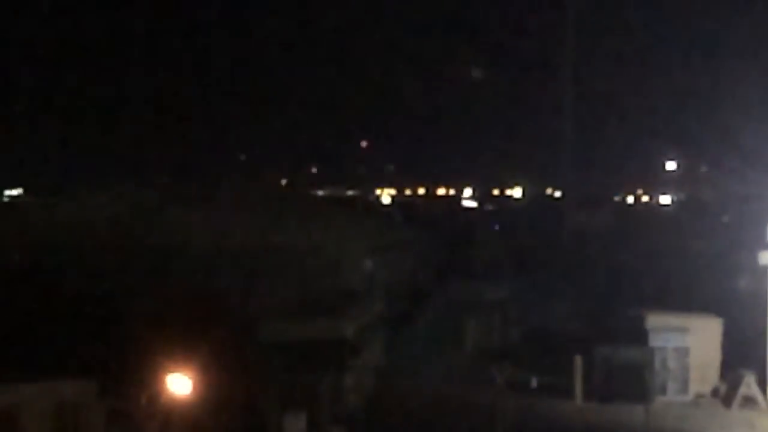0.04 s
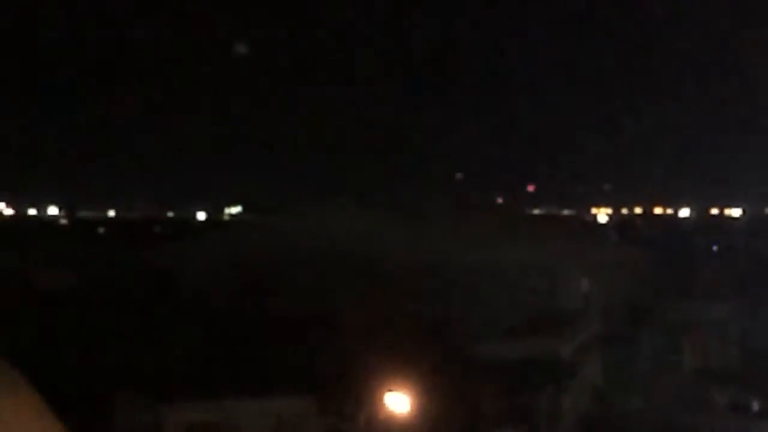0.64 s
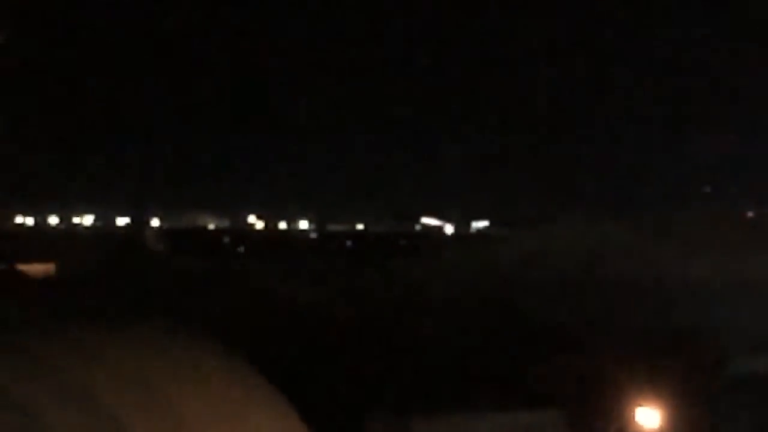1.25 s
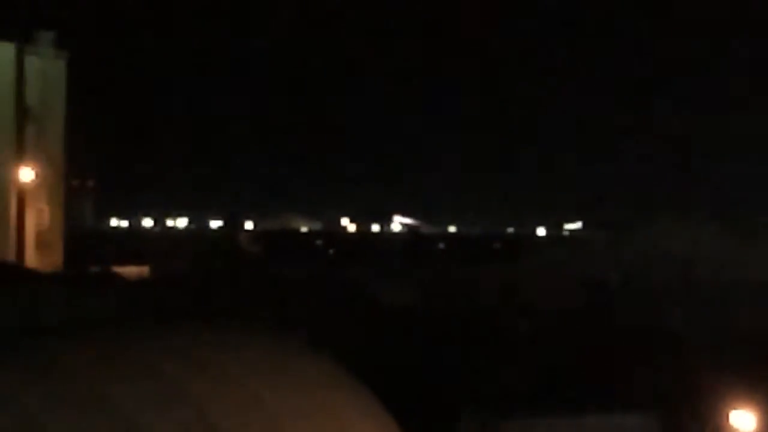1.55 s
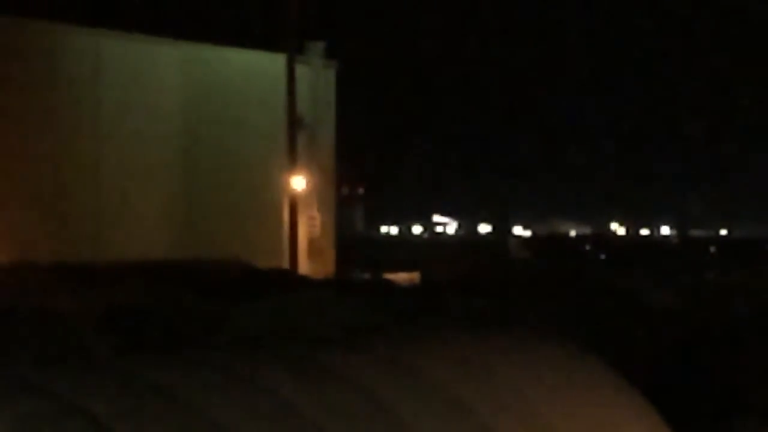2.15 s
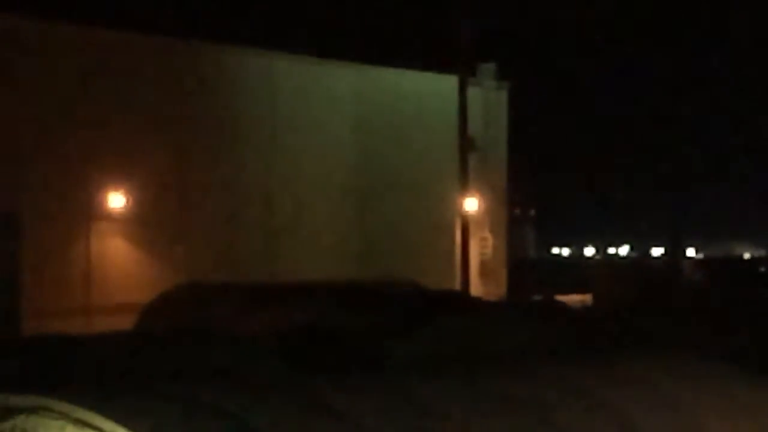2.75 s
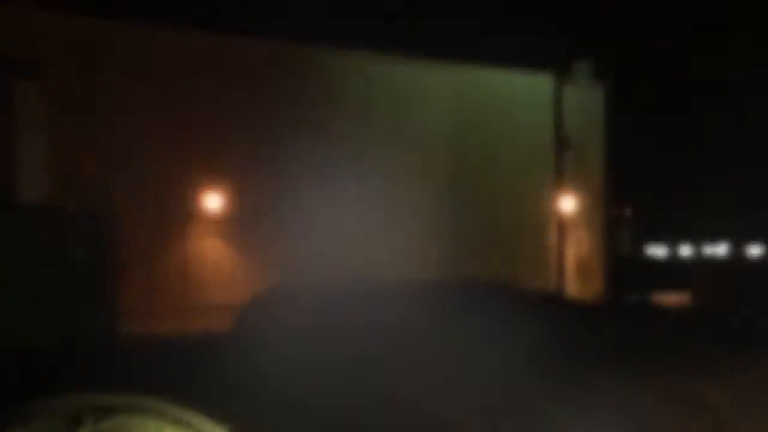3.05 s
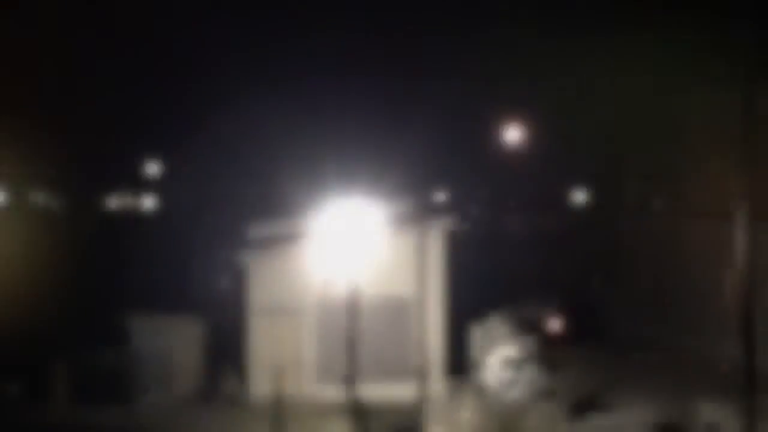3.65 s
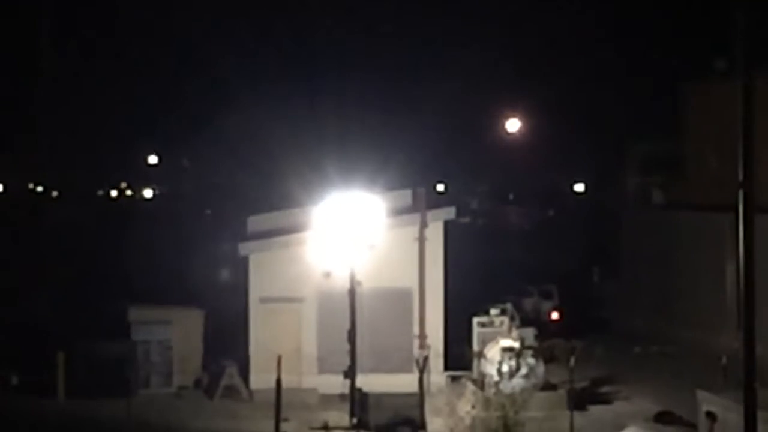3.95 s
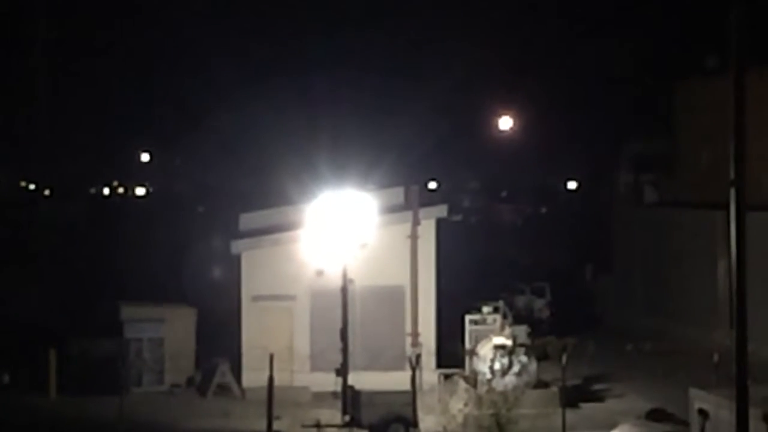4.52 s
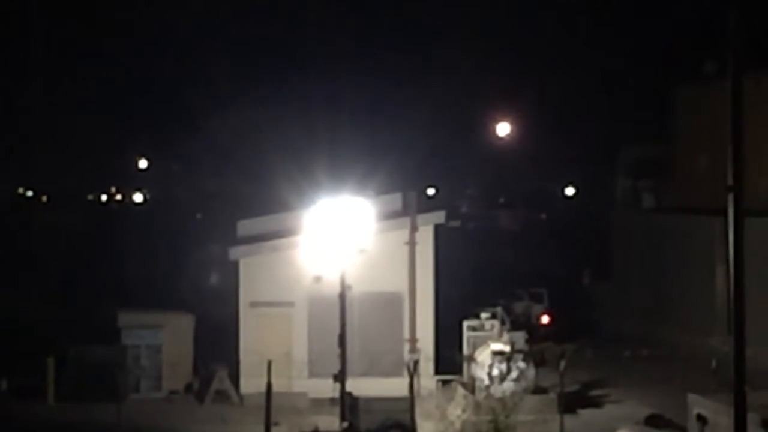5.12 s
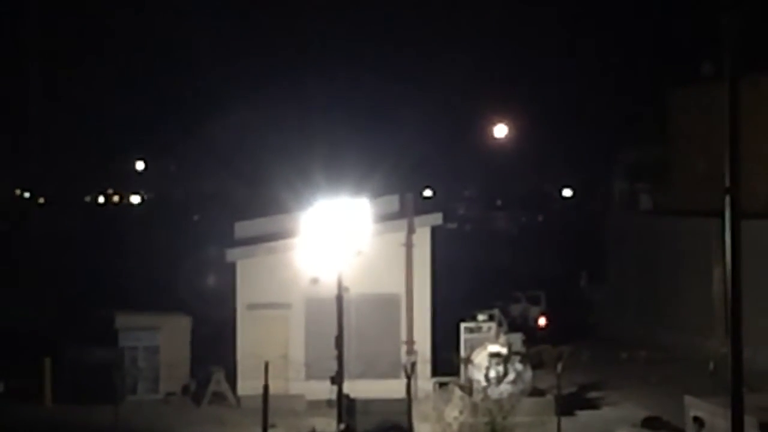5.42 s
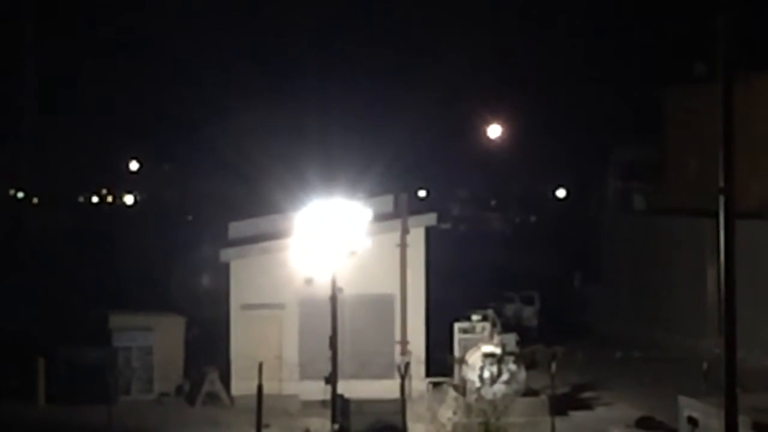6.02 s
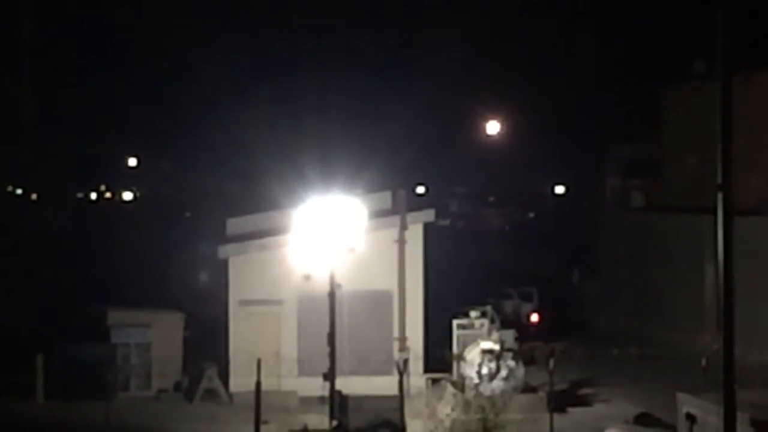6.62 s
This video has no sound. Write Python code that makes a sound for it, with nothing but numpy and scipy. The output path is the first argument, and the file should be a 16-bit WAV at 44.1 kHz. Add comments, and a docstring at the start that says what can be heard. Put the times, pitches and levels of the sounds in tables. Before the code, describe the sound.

On an open airfield, rough gusts hit the microphone with booming, sharp crackles and a hollow ring, covering a low rumble. About halfway through, the wind dies down and a faraway jet taking off is left: a deep, pulsing rumble under a dull roar that gradually gets fuller and brighter. A faint whine fades into it, with a few very soft finger scuffs near the microphone.

```python
"""A jet takes off far across an airfield at night. At first a blast of wind scours the one microphone
of a turning camera: eddies roar, crackle and ring in its port and boom against the body.
After three and a half seconds the microphone is in the lee. The jet's deep rumble and distant roar
take over and slowly grow, a faint turbine whine sinks into them, and fingers brush the casing."""
import sys
import numpy as np
from scipy import signal
from scipy.fft import rfft, irfft, next_fast_len
from scipy.io import wavfile
from scipy.ndimage import uniform_filter1d, map_coordinates

SR = 44100
rng = np.random.default_rng(int(sys.argv[2]) if len(sys.argv) > 2 else 0)


def wav_record(signal):
    """Record a signal, one row per channel, as 16-bit PCM in the file named by sys.argv[1]."""
    frames = np.transpose(np.atleast_2d(signal))
    bounded = np.clip(frames, -1, 1)
    # unit amplitude maps onto the largest positive 16-bit level
    quanta = np.round(bounded * 32767).astype(np.int16)
    wavfile.write(sys.argv[1], SR, quanta)


N = 298557

# short gusts that rasp and crackle in the port: t/s, half-length/s, rasp level/dB, crackle level/dB
PORT_GUSTS = [(0.256, 0.14, -31, -67), (0.535, 0.023, -30, -70), (0.684, 0.048, -34, -54),
              (0.803, 0.027, -30, -66.5), (0.879, 0.027, -26.5, -50), (1.112, 0.02, -30, -60),
              (1.23, 0.036, -31, -66), (1.417, 0.035, -34, -77), (2.05, 0.064, -33, -61),
              (2.26, 0.0098, -46, -53), (2.33, 0.016, -32, -55), (2.394, 0.027, -36, -55),
              (2.737, 0.012, -37, -47.5), (2.79, 0.012, -49, -56), (2.92, 0.011, -34, -60),
              (2.963, 0.021, -34, -54), (3.02, 0.039, -35.5, -52), (3.12, 0.022, -35, -52),
              (3.178, 0.018, -50, -56), (3.255, 0.012, -36, -53), (3.3, 0.016, -53, -52),
              (3.364, 0.036, -47, -54), (3.447, 0.012, -40, -52), (3.517, 0.029, -42, -51.5),
              (3.563, 0.012, -39, -53), (3.604, 0.013, -49, -51), (3.662, 0.033, -59, -57),
              (3.806, 0.028, -54, -54)]


def amp(db):
    """Decibels to gain."""
    return 10 ** (np.asarray(db) / 20)


def unit(x):
    """x at rms 1."""
    return x / np.sqrt(np.mean(x ** 2) + 1e-20)


def clock():
    """The time of each sample in seconds."""
    return np.arange(N) / SR


def curve(points):
    """An envelope of straight lines through (t/s, value) points."""
    return np.interp(clock(), *np.transpose(points))


def swells(rows):
    """The summed gain of bell-shaped swells: t/s, half-length/s, level/dB."""
    return sum(amp(db) * np.exp(-.5 * ((clock() - s) / length) ** 2) for s, length, db in rows)


def wobble(rate):
    """A smooth random curve, rate knots a second."""
    knots = rng.standard_normal(int(N * rate / SR) + 4)
    return map_coordinates(knots, [clock() * rate], mode="nearest")


def filtered(x, response):
    """x through a gain that depends on frequency."""
    size = next_fast_len(N + 8192)
    return irfft(rfft(x, size) * response(np.fft.rfftfreq(size, 1 / SR)), size)[:N]


def coloured(x, eq):
    """x through an EQ curve of (f/Hz, level/dB) points on a log axis."""
    f, db = np.transpose(eq)
    return filtered(x, lambda hz: amp(np.interp(np.log(hz + 1), np.log(f), db, left=-120, right=-120)))


def steadied(x, seconds):
    """x at rms 1, its slow swells evened out and its fast flutter kept."""
    power = np.abs(uniform_filter1d(x ** 2, size=int(seconds * SR) + 1))
    return unit(x / np.sqrt(power + 1e-9))


def turbulence(eq, patchy_db):
    """Coloured noise of rms 1 whose bands fade in and out in random patches."""
    bands = signal.stft(rng.standard_normal(N), nperseg=1024)[2]
    patches = uniform_filter1d(rng.standard_normal(bands.shape), size=3, axis=0)
    patches = unit(uniform_filter1d(patches, size=12, axis=1))
    noise = signal.istft(bands * amp(patchy_db * patches), nperseg=1024)[1][:N]
    return unit(coloured(noise, eq))


def narrow_noise(hz, width_hz):
    """Noise of rms 1 in one resonance, which may glide."""
    phase = 2 * np.pi * np.cumsum(hz * np.ones(N)) / SR
    band = lambda: filtered(rng.standard_normal(N), lambda f: 1 / (1 + (2 * f / width_hz) ** 2) ** 1.16)
    return unit(band() * np.cos(phase) + band() * np.sin(phase))


def pop_train(rate, spread_db):
    """Pressure jumps of random size at random moments, about rate a second."""
    chance, size = rng.random(N), rng.standard_normal(N)
    return unit((chance < rate / SR) * amp(spread_db * np.minimum(size, 2.5)))


def exposure(cut_s, fade_s):
    """Fades from 1 to 0 as the microphone turns out of the wind."""
    return .5 - .5 * np.tanh((clock() - cut_s) / fade_s)


def head_on():
    """Fades from 1 to 0 as the port turns from facing the wind to lying aslant."""
    return exposure(cut_s=2.7, fade_s=.35)


def wind_db():
    """How far the wind is above its usual strength."""
    # wind on the microphone: t/s, level/dB
    strength = [(0.0, -28.5), (0.25, -25), (0.43, -24), (0.47, -18), (0.58, -25), (0.6, -20.5), (0.92, -23),
                (0.96, -27), (1.1, -25), (1.4, -21.5), (1.58, -30), (1.86, -27.5), (2.01, -22.5),
                (2.3, -19.5), (2.5, -24), (2.78, -23.5), (2.84, -27.5), (3.08, -23), (3.42, -28),
                (3.76, -38.5), (3.9, -44)]
    usual_db = -24
    return curve(strength) - usual_db


def jet_growth(start_s=3.9):
    """Seconds squared since start_s: the shape of the jet's ever faster crescendo in dB."""
    return np.maximum(clock() - start_s, 0) ** 2


def scuffs():
    """Fingers shift softly on the casing."""
    # light touches: t/s, half-length/s, level/dB
    touches = [(4.378, .004, -74), (4.783, .005, -75.5), (5.836, .007, -71), (5.883, .010, -68.5),
               (5.94, 0.021, -77), (6.48, .008, -76)]
    friction_eq = [(2000, -9), (4500, 3.5), (6000, -1), (7500, -13.5), (8200, -35)]
    return swells(touches) * turbulence(friction_eq, patchy_db=4)


def jet_rumble():
    """The jet's low end throbs in two humps and surges now and then; it is leaner while the gusts last."""
    # slow course of the rumble, and its brief surges: t/s, level/dB
    course = [(0, -37.5), (1.1, -37), (1.5, -29), (2.2, -32.5), (3.4, -31), (3.8, -26), (4.3, -22.5),
              (4.42, -28.5), (4.55, -25), (5.2, -24.5), (5.31, -30), (5.45, -24.5), (6.25, -25.5),
              (6.77, -27.5)]
    surges = [(2.6, -26), (3.81, -22), (4.2, -28), (4.58, -25), (4.76, -25), (5.11, -24.5), (5.76, -23),
              (5.92, -28), (6.5, -22.5), (6.6, -23)]
    # the bass bed: f/Hz, level/dB
    bed_eq = [(15, -23.5), (25, -15.5), (36, -3.5), (45, -11), (58, 1.5), (72, -12), (82, -4), (94, -1),
              (112, -11.5), (140, -24.5), (220, -46)]
    # narrow humps on that bed: f/Hz, width/Hz, relative level/dB
    hump_bands = [(58, 24, -2.5), (94, 32, -5.5)]
    surge_gain = swells([(s, 0.038, db) for s, db in surges])
    gain = np.hypot(amp(curve(course) + 0.54 * wobble(9.3)), surge_gain)
    humps = sum(amp(db) * narrow_noise(hz, width_hz) for hz, width_hz, db in hump_bands)
    deep = turbulence(bed_eq, patchy_db=0) + humps
    lean = coloured(deep, [(15, -22.5), (30, -9.5), (45, -11.5), (75, -3.5), (250, 3.5)])
    gusty = exposure(cut_s=3.8, fade_s=.2)
    return gain * steadied(gusty * lean + (1 - gusty) * deep, seconds=0.17)


def jet_exhaust():
    """Exhaust noise dulled by distance: over a faint steady hiss, the brighter layers grow faster."""
    # exhaust layers from low to high: f/Hz, level/dB
    drone_eq = [(90, -20), (130, 1.5), (175, -5), (222, 1.2), (270, -0.9), (310, -3.5), (365, -4),
                (425, -13), (560, -28.5)]
    middle_eq = [(380, -13.5), (480, 0), (560, 0.5), (680, -1.5), (820, -2.5), (960, -4.5), (1080, -16.5),
                 (1600, -44.5)]
    wash_eq = [(600, -16), (1050, 1), (1300, -0.5), (1700, -4), (2100, -9.5), (2600, -20), (3500, -35),
               (5000, -46), (7300, -54.5), (8000, -56)]
    edge_eq = [(1500, -13.5), (2300, 4.5), (3000, -5), (4200, -23)]
    hiss_eq = [(2500, -3.5), (3500, 0.0), (5000, -7), (7400, -12.0), (8100, -30.5)]
    # swells of the drone: t/s, half-length/s, level/dB
    drone_swells = [(4.0, 0.022, -33), (4.4, 0.051, -33.5), (4.55, 0.022, -29), (5.0, 0.042, -33),
                    (5.82, 0.065, -32), (6.29, 0.044, -27)]
    growth = jet_growth()
    drone_gain = np.hypot(amp(-32 + 0.33 * growth + 0.14 * wobble(19)), swells(drone_swells))
    drone = drone_gain * steadied(turbulence(drone_eq, patchy_db=2.5), seconds=0.23)
    middle = amp(-39 + 0.65 * growth + 0.5 * wobble(21)) * turbulence(middle_eq, patchy_db=1.0)
    wash = amp(-50 + 1.02 * growth + 0.71 * wobble(22)) * turbulence(wash_eq, patchy_db=1.0)
    hiss = amp(-76.5) * turbulence(hiss_eq, patchy_db=2.0)
    edge = amp(-79 + 2.5 * growth) * turbulence(edge_eq, patchy_db=0.5)
    return drone + middle + wash + edge + hiss


def jet_turbine():
    """A blurred hum and a whine that wavers with the shaft speed; both sink as the roar grows."""
    # whine partials: f/Hz, amplitude before the fade/dB
    partials = [(460, -58.5), (928, -46.3), (1586, -70.5)]
    fade_db = -1.5 * jet_growth()
    hum = amp(-40.3 + fade_db) * steadied(narrow_noise(221, width_hz=8.7), seconds=0.4)
    shaft_speed = 1 + 0.0037 * wobble(5.5) + 0.007 * wobble(60)
    phase_per_hz = 2 * np.pi * np.cumsum(shaft_speed) / SR
    whine = sum(amp(db + fade_db + 2.1 * wobble(11)) * np.sin(hz * phase_per_hz) for hz, db in partials)
    return hum + whine


def buffeting():
    """Large slow eddies boom, howl and throb against the camera body."""
    # envelopes of boom and howl: t/s, relative level/dB
    boom_course = [(0.04, -29), (0.14, -23.5), (1.11, -23), (1.17, -17), (1.23, -24.5), (1.49, -17),
                   (1.6, -21.5), (2.2, -21), (2.6, -21), (3.29, -22.5), (3.7, -36.5)]
    howl_course = [(0.0, -28.5), (0.17, -25.5), (0.84, -21.5), (1.02, -29), (1.22, -22.5), (1.59, -28),
                   (2.5, -22), (2.95, -17.5), (3.35, -25), (3.6, -25.5), (3.8, -22.5)]
    # their tone colours: f/Hz, level/dB
    boom_eq = [(60, -46.5), (85, -25.5), (108, -1.5), (150, -0.5), (190, 2), (225, -2), (270, -14),
               (400, -32)]
    howl_eq = [(190, -25.5), (270, 1), (330, 3.5), (410, 1.5), (540, 3.5), (680, -1.5), (820, -12),
               (980, -11), (1300, -30.5)]
    # big eddies that throb at one pitch: t/s, half-length/s, f/Hz, level/dB
    eddies = [(0.005, 0.025, 200, -23), (0.276, 0.019, 210, -24.5), (1.165, 0.023, 195, -20),
              (1.442, 0.0097, 170, -16.5), (1.477, 0.021, 185, -27.5), (1.532, 0.021, 135, -17),
              (1.703, 0.016, 170, -19), (1.822, 0.0082, 172, -15), (1.908, 0.028, 175, -20.5),
              (1.975, 0.032, 191, -20.5), (2.552, 0.096, 81.8, -25), (2.79, 0.027, 195, -21),
              (3.234, 0.25, 225, -23.5)]
    boom_gain = amp(curve(boom_course) + .6 * wobble(9.9))
    boom = boom_gain * steadied(turbulence(boom_eq, patchy_db=2.5), seconds=0.17)
    howl_gain = amp(curve(howl_course) - 1.75 + 0.63 * wobble(15.0))
    howl = howl_gain * steadied(turbulence(howl_eq, patchy_db=1.5), seconds=0.078)
    throbs = sum(swells([(s, length, db)]) * steadied(narrow_noise(hz, width_hz=36), seconds=0.073)
                 for s, length, hz, db in eddies)
    return boom + howl + throbs


def skim():
    """One gust skims the edge of the port: a thin, airy hiss swells into a lower, fuller one."""
    thin_eq = [(4000, -10), (6000, 4), (9000, -8), (12000, -20), (15200, -24)]
    full_eq = [(2500, -8), (4000, 4.5), (5200, 0.5), (6500, -11), (9500, -31), (12000, -45)]
    thin = swells([(0.474, .02, -52)]) * turbulence(thin_eq, patchy_db=4)
    full = swells([(0.503, .021, -33.5)]) * turbulence(full_eq, patchy_db=3)
    return thin + full


def port_notes():
    """Air blows hollow notes in the microphone port, each sinking as the camera turns."""
    # notes at changing angles of the air: t/s, half-length/s, f/Hz, level/dB
    notes = [(0.17, 0.054, 310, -26.5), (0.33, 0.052, 310, -28), (0.36, 0.017, 726, -20.5),
             (0.4, 0.012, 910, -21), (0.5, 0.086, 691, -27), (0.74, 0.064, 575, -20.5),
             (0.55, 0.03, 310, -23.5), (0.72, .07, 300, -29.5), (0.93, 0.061, 300, -24.5),
             (1.1, 0.038, 340, -26.5), (1.28, 0.084, 320, -25), (1.7, .1, 900, -35.5),
             (2.13, 0.064, 750, -28), (2.72, 0.02, 442.7, -19), (2.795, 0.008, 500, -17.5),
             (3.0, 0.029, 360, -19), (3.14, 0.038, 380, -25.5), (3.22, .06, 640, -27),
             (3.476, 0.11, 528, -27)]
    sag_hz_per_s = 350
    hollow = np.zeros(N)
    for s, length, hz, db in notes:
        pitch_hz = hz - sag_hz_per_s * np.clip(clock() - s, -.5, .5)
        hollow += swells([(s, length, db)]) * steadied(narrow_noise(pitch_hz, width_hz=220), seconds=0.12)
    return hollow


def port_ring():
    """The wind excites a narrow ring in the port, strongest head on."""
    # gusts that set it going: t/s, half-length/s, relative level/dB
    gusts = [(0.26, 0.07, -24), (0.475, 0.02, -25.5), (0.63, 0.04, -22), (0.695, 0.0093, -22),
             (0.905, 0.0066, -18.5), (2.165, 0.0074, -18), (2.26, 0.04, -27)]
    whistle = narrow_noise(1735 + 55 * wobble(8), width_hz=260)
    gain = np.hypot(amp(-31 + 0.74 * wind_db() + 3.3 * wobble(16)), swells(gusts))
    return gain * (0.43 + 0.46 * head_on()) * steadied(whistle, seconds=0.057)


def wind_ticks():
    """Each sharp tick is one pressure jump with its treble rolled off, and a brief sputter after it."""
    # ticks in the rush: t/s, peak level before the EQ/dB, treble roll-off/(dB per kHz)
    ticks = [(0.2454, -19.5, 3.9), (0.33, -22, 4.6), (0.3912, -22, 5), (0.641, -23, 4.3),
             (0.6601, -20, 3.1), (0.7017, -23.5, 4.5), (0.7387, -23, 4.2), (0.7679, -23, 4),
             (0.8013, -11, 4.2), (0.8267, -18.5, 4.5), (0.8595, -14, 4), (0.8736, -10.5, 2.7),
             (0.9031, -22, 3.7), (1.3717, -27, 4.4), (1.3976, -20, 4.8), (1.498, -29, 4.6),
             (2.0173, -23, 4.5), (2.0641, -23.5, 4.8), (2.2629, -21.5, 3.3), (2.3068, -15.5, 4),
             (2.3147, -12.5, 4.7), (2.3246, -19.5, 3.3), (2.3365, -17.5, 4.4), (2.7116, -26, 4.6),
             (2.7375, -25, 3.4), (2.7474, -25, 3.4), (3.1078, -25, 3.8), (3.3025, -21, 3.9),
             (3.4446, -28, 3.2), (3.5076, -29, 3.3), (3.5439, -31, 3.3), (3.6084, -32.5, 3.1)]
    # EQ over all the ticks: f/Hz, level/dB
    tick_eq = [(2000, 0), (9000, 0), (12000, -4), (14000, -10), (15200, -18)]
    size, low_cut_hz, sputter_s = SR // 100, 3000, .0008
    hz = np.fft.rfftfreq(size, 1 / SR)
    t = (np.arange(size) - size // 2) / SR
    low_cut = hz ** 4 / (hz ** 4 + low_cut_hz ** 4)
    snaps = np.zeros(N)
    for s, db, rolloff_db in ticks:
        sputter = .12 * (t > 0) * np.exp(-np.abs(t) / sputter_s) * rng.standard_normal(size)
        jump = (t == 0) + sputter
        snap = irfft(rfft(jump) * amp(-rolloff_db * hz / 1000) * low_cut, size)
        snaps[round(s * SR) - size // 2:][:size] += amp(db) * snap / np.abs(snap).max()
    return coloured(snaps, tick_eq)


def wind_crackle(flutter):
    """Strong gusts spit pops of very uneven size over a softer hiss."""
    # tone colours of pops and hiss: f/Hz, level/dB
    pop_eq = [(1000, -6.5), (3500, 1), (6000, 6.5), (8000, -2), (10000, -10), (12500, -19.5), (15000, -39)]
    hiss_eq = [(1000, -7), (3500, -5), (6000, 4.5), (8000, 0), (10000, -9), (12500, -16.5), (15000, -34)]
    gust_gain = swells([(s, length, db) for s, length, _, db in PORT_GUSTS])
    gain = np.hypot(amp(-65 + 0.71 * wind_db()), gust_gain)
    pops = amp(2.5 + 1.8 * flutter) * unit(coloured(pop_train(rate=1300, spread_db=9.5), pop_eq))
    hiss = amp(-2.0 + 1.2 * flutter) * turbulence(hiss_eq, patchy_db=6.0)
    return gain * (pops + hiss)


def wind_rasp(flutter):
    """Strong gusts rasp in the port: dense, nearly even pressure jumps blend with patchy noise."""
    # tone colour of the rasp: f/Hz, level/dB
    rasp_eq = [(1800, -29.5), (2900, 5), (3500, 0), (4300, -4), (5300, -9.5), (7000, -21), (9000, -34.5),
               (12000, -61.5), (15000, -67)]
    gust_gain = swells([(s, length, db) for s, length, db, _ in PORT_GUSTS])
    gain = np.hypot(amp(-34 + 0.68 * wind_db()), gust_gain) * amp(0.97 * flutter)
    grit = unit(coloured(pop_train(rate=1500, spread_db=2.0), rasp_eq))
    return gain * (amp(-7.0) * grit + amp(-6.0) * turbulence(rasp_eq, patchy_db=4.0))


def wind_roar(flutter):
    """Fine eddies roar at the edge of the port, duller as it turns away."""
    # tone colour head on, and the EQ added once the port lies aslant: f/Hz, level/dB
    roar_eq = [(450, -14), (700, -3.5), (800, -6), (930, -3.5), (1130, -2), (1300, -3.5), (1450, -5),
               (1750, -7), (2050, -8.7), (2300, -12), (2700, -15.5), (3300, -29.5), (5000, -47)]
    aslant_eq = [(400, 0), (850, 2), (1400, -1.2), (2100, -1.8), (3000, -0.5), (5000, 0)]
    # brief flares of the roar: t/s, half-length/s, level/dB
    flares = [(0.12, 0.017, -21.5), (0.79, 0.025, -20.5), (1.22, 0.014, -20), (1.355, 0.0071, -17),
              (2.14, .012, -28.5), (3.42, 0.027, -30)]
    gain = np.hypot(amp(-22 + 0.76 * wind_db() + 0.77 * flutter), swells(flares))
    eddies = steadied(turbulence(roar_eq, patchy_db=3.0), seconds=0.079)
    return gain * (head_on() * eddies + (1 - head_on()) * coloured(eddies, aslant_eq))


def scene():
    """The wind crossfades into the far jet's roar over a lasting rumble."""
    flutter = wobble(27.75)  # shakes roar, rasp and crackle together
    blast = wind_roar(flutter) + wind_rasp(flutter) + wind_crackle(flutter)
    port = blast + port_notes() + port_ring() + wind_ticks() + skim()
    port_gain = exposure(cut_s=3.687, fade_s=0.18)
    body_share = exposure(cut_s=3.62, fade_s=0.11)
    wind = port_gain * port + np.sqrt(body_share) * buffeting()
    jet = np.sqrt(1 - body_share) * (jet_exhaust() + jet_turbine()) + jet_rumble()
    return (wind + jet + scuffs())[None]


def record(dry):
    """The microphone rounds the highest peaks and keeps nothing above its band limit."""
    ceiling, top_hz = .6, 15250
    rounded = dry[0] / (1 + np.abs(dry[0] / ceiling) ** 8) ** (1 / 8)
    return filtered(rounded, lambda hz: hz < top_hz)[None]


dry = scene()
out = record(dry)
wav_record(out)
```